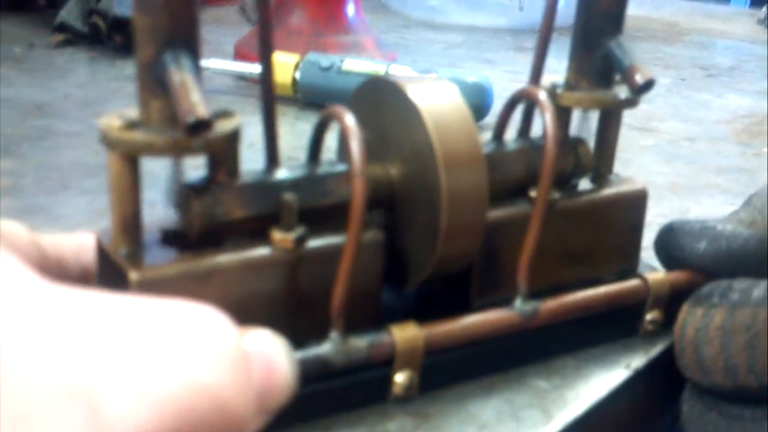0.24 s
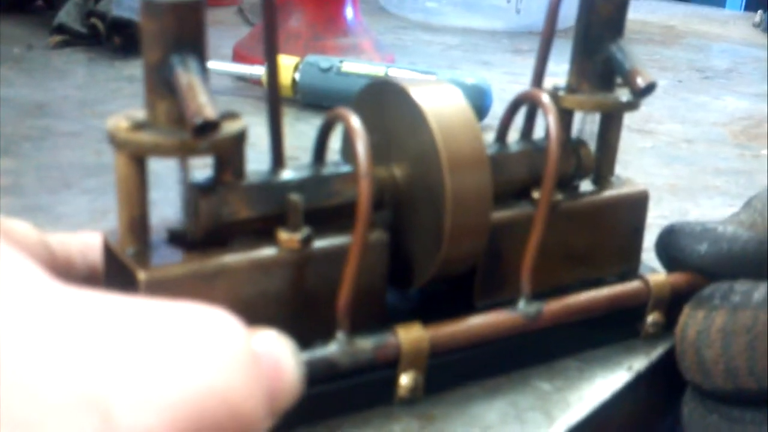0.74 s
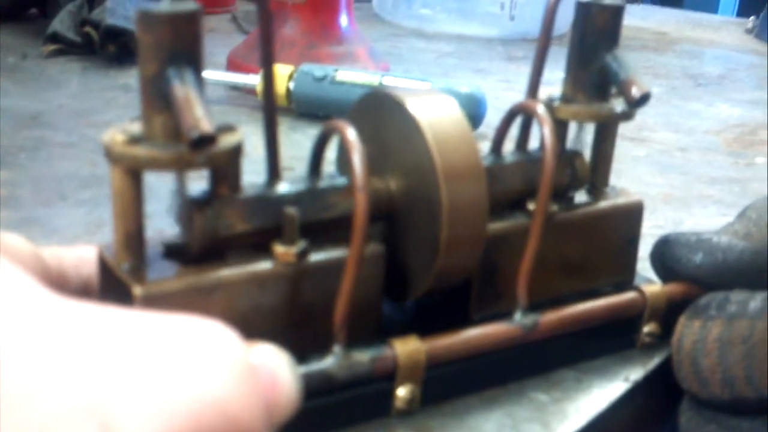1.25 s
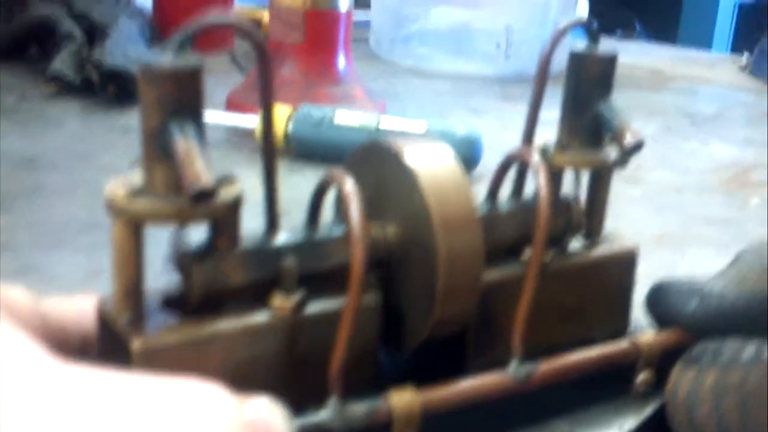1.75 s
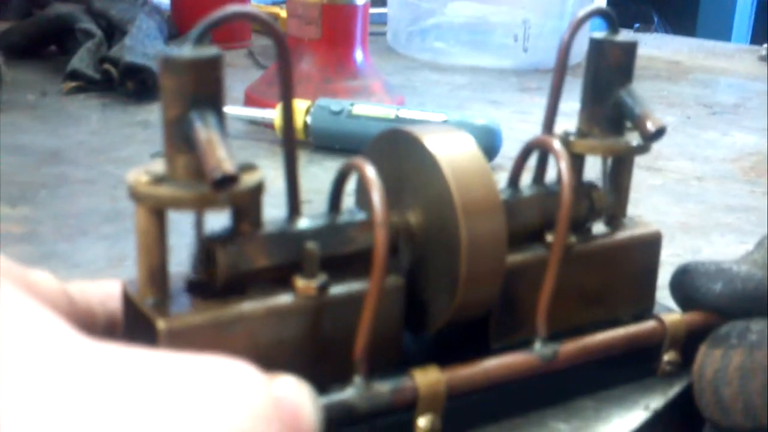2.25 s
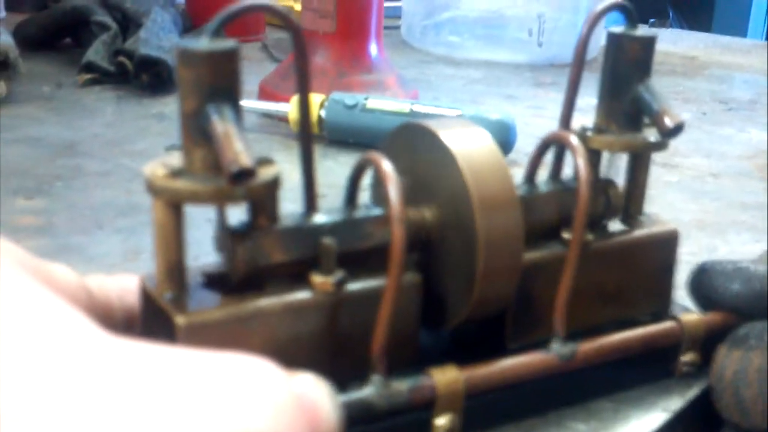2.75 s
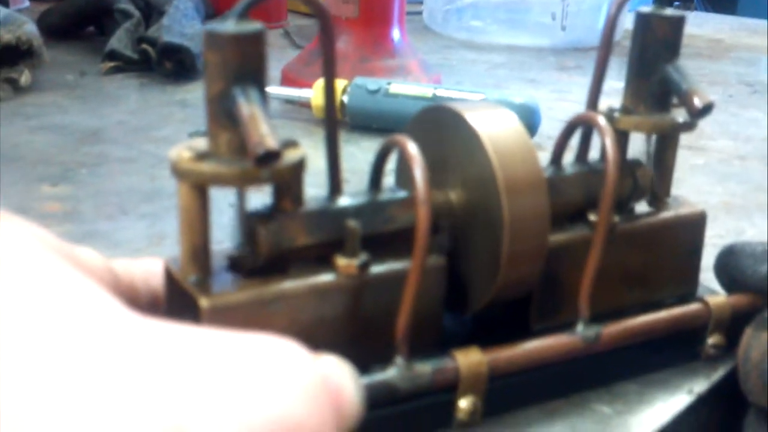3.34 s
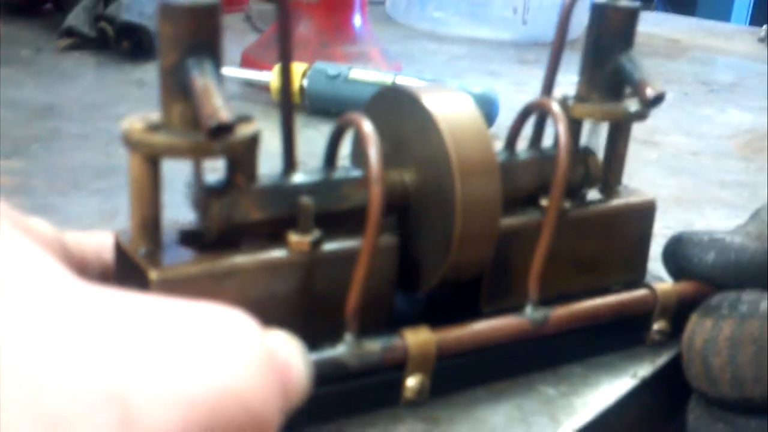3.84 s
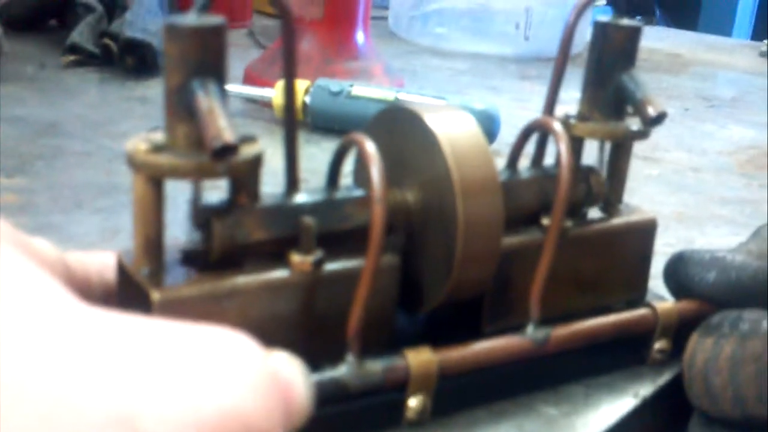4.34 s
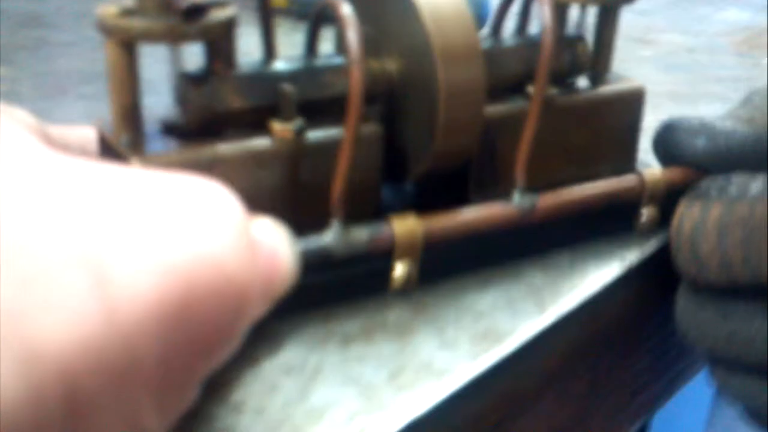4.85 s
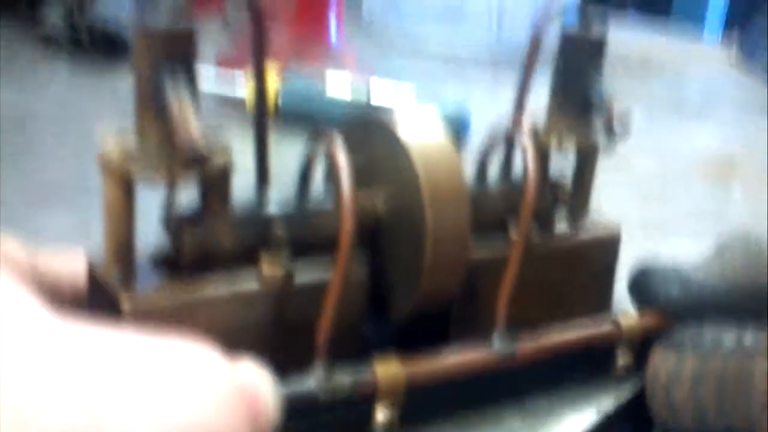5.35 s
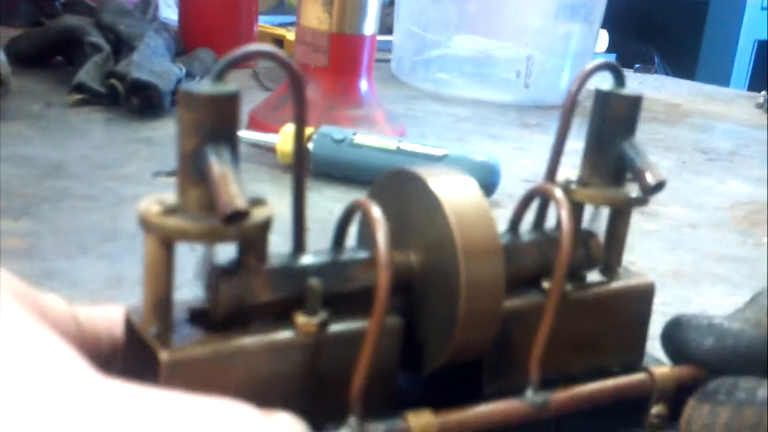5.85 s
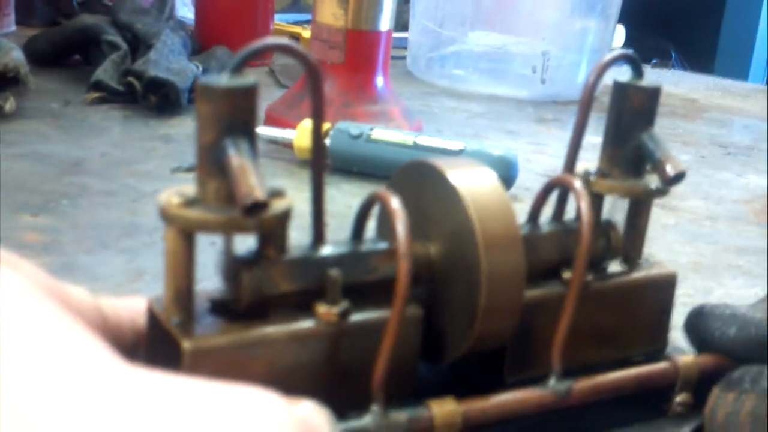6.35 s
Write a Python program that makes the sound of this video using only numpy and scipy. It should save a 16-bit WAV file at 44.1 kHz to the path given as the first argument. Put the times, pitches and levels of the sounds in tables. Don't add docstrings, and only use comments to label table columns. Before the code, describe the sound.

A small model engine on compressed air chuffs in rapid hissing, whistling puffs, slows almost to a stall, then surges unevenly back to full speed.

```python
import sys
import numpy as np
from scipy import signal
from scipy.fft import rfft, irfft
from scipy.io import wavfile
from scipy.ndimage import uniform_filter1d

SR = 44100
rng = np.random.default_rng(int(sys.argv[2]) if len(sys.argv) > 2 else 0)


def ratio_of_db(decibels):
    return 10 ** (np.asarray(decibels, float) / 20)


def digitize_waveform(pressure):
    field = np.atleast_2d(pressure).T
    bounded = np.clip(field, -1, 1)
    quanta = np.round(bounded * 32767).astype(np.int16)
    wavfile.write(sys.argv[1], SR, quanta)


N = 291845
TURN_COUNT = 87
FULL_SPEED = 16.2


def column(table, at, index=1):
    rows = np.array(table)
    return np.interp(at, rows[:, 0], rows[:, index])


def coloured(spectrum, channels=3):
    hz = np.fft.rfftfreq(N, 1 / SR) + 1
    rows = np.array(spectrum)
    gain_db = np.interp(np.log(hz), np.log(rows[:, 0]), rows[:, 1], left=-60)
    x = irfft(rfft(rng.standard_normal((channels, N))) * ratio_of_db(gain_db), N)
    return x / x.std()


def walk(rate_hz):
    length = int(SR / rate_hz)
    x = uniform_filter1d(uniform_filter1d(rng.standard_normal(N), length), length)
    return x / x.std()


def turn_chances(turn):
    return rng.standard_normal((TURN_COUNT, 2))[turn].T


def widen(left, right, pan_db):
    return np.array([left * ratio_of_db(pan_db / 2), -np.roll(right, 16) * ratio_of_db(-pan_db / 2)])


# (frequency [Hz], share [0-1])
UNRELATED_SHARE = [(500, 0.26), (1900, 1), (5000, 0.75), (6300, 0.19), (7700, 0.77), (9500, 0.7),
                   (16000, .3)]


def ports(trio, pan_db, loose):
    loose = np.clip(loose, 0, 1)
    share = np.clip(column(UNRELATED_SHARE, np.fft.rfftfreq(N, 1 / SR)), 0, 1)
    other = irfft(np.sqrt(1 - share) * rfft(trio[0]) + np.sqrt(share) * rfft(trio[1]), N)
    late = np.sqrt(1 - loose) * trio[0] + np.sqrt(loose) * trio[2]
    mid = widen(trio[0], late, pan_db).mean(axis=0)
    left, right = widen(other, other, pan_db)
    return mid + np.array([left - right, right - left]) / 2


# (time [s], speed [turns per s])
FLYWHEEL_SPEED = [(0, 16.088), (.29, 15.529), (1.14, 14.505), (1.54, 12.299), (2.01, 8.133), (2.25, 6.66),
                  (2.37, 6.101), (3.21, 9.987), (3.24, 9.907), (4.16, 12.684), (4.77, 13.245),
                  (5.63, 15.755), (6.7, 16.862)]


def slowing(t):
    return FULL_SPEED - column(FLYWHEEL_SPEED, t)


# (time [s], pressure at the fittings [dB], pressure left as the near port shuts [dB])
AIR_SUPPLY = [(0, 0, -6), (.62, 0, -5.5), (.94, .5, -7), (1.68, -3.5, -7), (2.25, -0.5, -6), (2.45, 1, 3),
              (2.9, 1.5, 3), (3.2, 0.5, -1.5), (3.95, 1.5, 1.5), (4.25, -0.5, -5), (4.65, 1, -2.5),
              (5.0, 1, 1.5), (5.55, 0.5, 1.5), (5.95, 0.5, -5), (6.3, 1, 0.5), (6.62, 1, 0.5)]
# (share of turn, level [dB])
NEAR_FLOW_TURN = [
    (0, -1),
    (.025, 3),
    (.1, 1),
    (.16, -2.5),
    (.275, -1),
    (.325, -10),
    (.4, -24),
    (.94, -30),
    (1, -1),
]
# (frequency [Hz], level [dB per Hz])
NEAR_PIPE_COLOUR = [(2500, -16), (4100, -17), (4900, -5.5), (5900, -4.5), (6900, -4), (8000, -11.5),
                    (9600, 0.5), (11200, -5), (13500, -1), (14400, -6.5), (15400, -2)]


def near_exhaust(t, turn, angle):
    db = -21 + 0.17 * column(AIR_SUPPLY, t) + 1.07 * turn_chances(turn)[0]
    db = db + column(NEAR_FLOW_TURN, angle) + 0.97 * walk(480)
    return ports(coloured(NEAR_PIPE_COLOUR) * ratio_of_db(db), -6.5, 0.051)


# (share of turn, level [dB], pitch [share of its top])
WHISTLE_TURN = [
    (0, -18, .97),
    (.05, -12, .97),
    (.17, -10, .98),
    (.21, -1, 1.02),
    (.268, -1, 1.02),
    (.276, -5.5, .78),
    (.31, -12, .76),
    (.36, -40, .8),
    (.7, -40, 1.0),
]


def whistle(t, turn, angle):
    pitch_chance, level_chance = turn_chances(turn)
    left_db = column(AIR_SUPPLY, t, index=2)
    slow_s = 1 / column(FLYWHEEL_SPEED, t) - 1 / FULL_SPEED
    top_hz = 6177 + 45 * left_db + 5400 * slow_s + 79.45 * pitch_chance
    hz = top_hz * column(WHISTLE_TURN, angle, index=2) * (1 + 0.014 * walk(204.7))
    spin = np.exp(2j * np.pi * np.cumsum(hz) / SR)
    trio = np.array([(spin * (1.78 + walk(1100) + 1j * walk(1100))).real for _ in range(3)])
    far_db = 27 * np.exp(-((angle - .79) / .04) ** 2)
    db = -27 + left_db + 1.34 * level_chance + column(WHISTLE_TURN, angle) + far_db
    return ports(trio * ratio_of_db(db + 0.36 * walk(120)), -5.0, 0.043)


# (share of turn, level [dB])
FAR_FLOW_TURN = [
    (.43, -30),
    (.49, -4),
    (.525, .5),
    (.6, -3.5),
    (.71, -2.5),
    (.77, 1.5),
    (.815, -6),
    (.88, -30),
]
# (frequency [Hz], level [dB per Hz])
FAR_PIPE_COLOUR = [(2000, -20), (3200, -10), (4000, -17), (5000, -13), (8000, -19), (9200, -5), (10000, 0),
                   (10900, -8), (13000, -9), (14500, -6), (15600, -9)]


def far_exhaust(t, turn, angle):
    db = -25.5 - 0.2 * slowing(t) + 1.5 * turn_chances(turn)[0]
    db = db + column(FAR_FLOW_TURN, angle) + 1.2 * walk(240)
    return ports(coloured(FAR_PIPE_COLOUR) * ratio_of_db(db), -7.0, 0.14)


def knock_db(t):
    return np.maximum(-59.5 - slowing(t), -66)


def knock(t, turns, share, db, pan_db, modes):
    chance = rng.standard_normal((TURN_COUNT, 2)).T
    at = np.interp(np.arange(TURN_COUNT) + share + 0.00076 * chance[0], turns, t, left=0)
    hits = np.zeros(N)
    hits[(at * SR).astype(int)] = ratio_of_db(knock_db(at) + db + 21 + 0.9 * chance[1])
    hits[0] = 0
    s = t[:SR // 10]
    ring = np.zeros(len(s))
    for hz, mode_db, t60 in modes:
        push = 1 - np.exp(-s * hz / 0.38)
        ring += ratio_of_db(mode_db) * np.sin(2 * np.pi * hz * s) * 1000. ** (-s / t60) * push
    x = signal.fftconvolve(hits, ring)[:N]
    return widen(x, x, pan_db)


# (frequency [Hz], level [dB], time to fall 60 dB [s])
BIG_END_MODES = [(166, -11.5, 0.13), (225, 2.5, 0.023), (442, -3.5, 0.019)]
CROSSHEAD_MODES = [(460, -3.5, 0.033), (597, 2, 0.025), (756, -3, 0.039), (1050, -5.5, 0.04)]
VALVE_MODES = [(2645, -30, 0.0074), (3187, 9, 0.016), (1476, -0.5, .015)]
REBOUND_MODES = [(630, 0.1, 0.031), (780, -2, 0.018)]


def crank_knocks(t, turns):
    big_end = knock(t, turns, .32, 4.2, 8.2, BIG_END_MODES)
    crosshead = knock(t, turns, .865, 3.1, 9.5, CROSSHEAD_MODES)
    valve = knock(t, turns, .385, 6.0, .1, VALVE_MODES)
    rebound = knock(t, turns, .465, -0.5, 6.6, REBOUND_MODES)
    return big_end + crosshead + valve + rebound


# (frequency [Hz], level [dB per Hz])
LEAK_COLOUR = [(130, -14), (1200, -10), (1800, -3), (2250, 0), (2700, -3), (3150, -1), (4000, -5),
               (5000, -2), (6100, .5), (7800, -3), (10000, 1), (13000, -2), (15800, -2)]
# (frequency [Hz], level [dB per Hz])
BENCH_COLOUR = [(300, -8.5), (600, -7), (900, -4.5), (1070, 2.5), (1270, -8), (1480, -0.5), (1750, 2),
                (2000, -28), (2600, -17)]


def leak(t):
    opened = np.clip(np.minimum(t - 2.31, 2.47 - t) / 0.027 + .5, 0, 1)
    db = column(AIR_SUPPLY, t) + 4.46 * opened
    jet = ports(coloured(LEAK_COLOUR) * ratio_of_db(db - 27.5 + 0.68 * walk(24.0)), -1.2, .03)
    body = coloured(BENCH_COLOUR) * ratio_of_db(db - 43 + 0.58 * walk(3.1))
    return jet + np.array([ratio_of_db(-4.0) * (body[0] + 0.18 * body[1]), ratio_of_db(3.0) * body[0]])


JOLT_S, JOLT_LENGTH_S = 2.447, .009


def jolt(t):
    hz, db, t60 = 150, -32, .04
    s = np.maximum(t - JOLT_S + JOLT_LENGTH_S / 2, 0)
    x = ratio_of_db(db) * np.sin(2 * np.pi * hz * s) * 1000. ** (-s / t60)
    return widen(x, x, 1.5)


# (frequency [Hz], level [dB per Hz])
RUMBLE_COLOUR = [(70, -36), (110, -5), (160, -6.5), (230, -4), (400, -3), (600, -5), (900, -27)]


def rumble(t):
    jolt_db = 15 * np.exp(-((t - JOLT_S) / JOLT_LENGTH_S) ** 2)
    db = 0.24 * knock_db(t) - 42.0 + walk(25) + jolt_db
    return ports(coloured(RUMBLE_COLOUR) * ratio_of_db(db), 4.0, 1.0)


# (frequency [Hz], level [dB per Hz])
ROCKING_COLOUR = [(55, -18), (85, -6), (110, -4), (150, -25), (300, -60)]


def rocking(t):
    near = np.exp(-((column(FLYWHEEL_SPEED, t) - 12.3) / 2.4) ** 2)
    return ports(coloured(ROCKING_COLOUR) * near * ratio_of_db(-62.5), .5, .6)


def scene():
    t = np.arange(N) / SR
    speed = column(FLYWHEEL_SPEED, t)
    turns = .588 + np.cumsum(speed) / SR
    turn = turns.astype(int)
    angle = turns - turn
    angle = angle - 0.35 * np.clip(1 / speed - .07, 0, .2) * np.sin(2 * np.pi * angle)
    air = near_exhaust(t, turn, angle) + whistle(t, turn, angle) + far_exhaust(t, turn, angle)
    base = crank_knocks(t, turn + angle) + jolt(t) + rumble(t) + rocking(t)
    return air + base + leak(t)


# (frequency [Hz], margin [dB])
STEREO_MARGIN = [(900, 22), (1400, 10.5), (1900, 7.5), (2400, 5), (3300, 4.5), (4400, 5.5), (5500, 9.5),
                 (7000, 8.5), (8300, 7.5), (9500, 11.5), (16000, 11.5)]
BAND_STARTS = np.r_[0:40:4, 40:96:8, 96:144:12, 144:1000:16]


def thin_faint_bands(x):
    frame = dict(fs=SR, window=np.sin(np.pi * (np.arange(2048) + .5) / 2048), nperseg=2048)
    hz, s, z = signal.stft(np.array([x[0] + x[1], x[0] - x[1]]) / 2, **frame)
    band_hz = hz[BAND_STARTS]
    width = np.diff(np.r_[BAND_STARTS, len(hz)])
    power = np.add.reduceat(abs(z) ** 2, BAND_STARTS, axis=1) / width[:, None]
    strong = power.max(axis=0)
    mask = np.sqrt(strong * strong.mean(axis=1, keepdims=True))
    tilt = np.where(band_hz < 4600, 1.2, -.3)[:, None]
    thrift_db = tilt * np.maximum(2.5 - .5 * slowing(s), -1)
    margin_db = column(STEREO_MARGIN, band_hz)[:, None] - thrift_db
    margin_db = margin_db + 1.9 * rng.standard_normal(power.shape)
    limit = mask / ratio_of_db(2 * margin_db)
    keep = (power > limit) | (power == strong)
    band = np.searchsorted(BAND_STARTS, np.arange(len(hz)), "right") - 1
    coarse_db = 5.4 * np.exp(-((hz - 3800) / 390) ** 2)[:, None]
    loud_line = abs(z) ** 2 > limit[:, band] * ratio_of_db(2 * (coarse_db - 3))
    mid, side = signal.istft(z * keep[:, band] * loud_line, **frame)[1][:, :N]
    return np.array([mid + side, mid - side])


def low_pass(x):
    return signal.sosfilt(signal.butter(12, 17090, fs=SR, output="sos"), x)


# (frequency [Hz], level [dB per Hz])
MIC_NOISE_COLOUR = [(15, 11), (60, 2), (120, -13.5)]
MIC_OFFSET = [
    [.0012],
    [-.0016],
]


def record(dry):
    cut = signal.sosfilt(signal.ellip(10, .3, 70, 15800, fs=SR, output="sos"), dry)
    cut = signal.sosfilt(signal.butter(3, 105, "high", fs=SR, output="sos"), cut)
    cut = cut + ports(coloured(MIC_NOISE_COLOUR), 0, 0.82) * ratio_of_db(-66.5)
    mix = thin_faint_bands(cut) + np.array(MIC_OFFSET)
    return low_pass(mix)


dry = scene()
out = record(dry)
digitize_waveform(out)
```